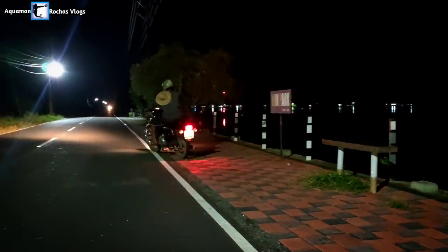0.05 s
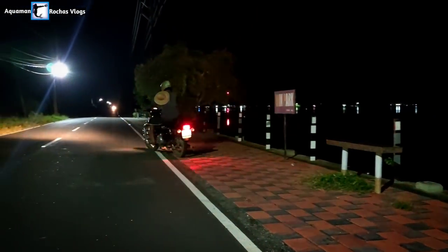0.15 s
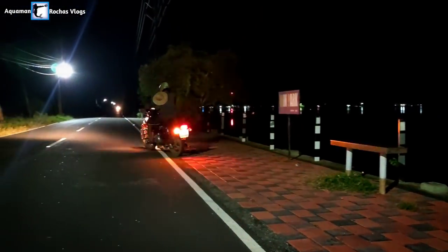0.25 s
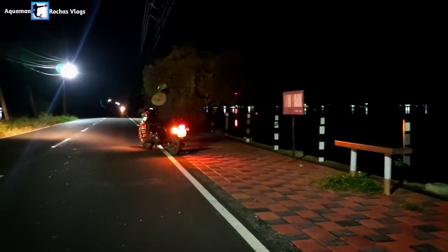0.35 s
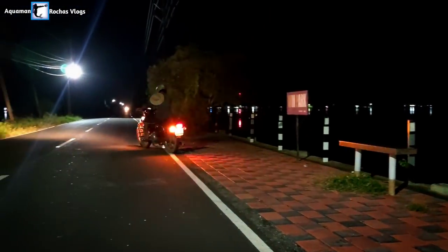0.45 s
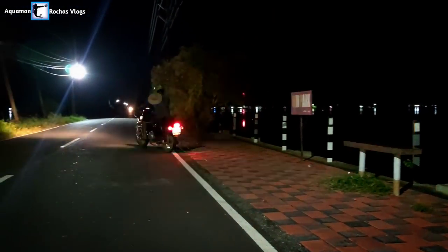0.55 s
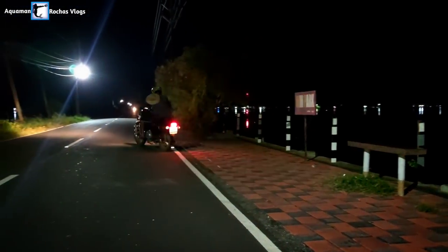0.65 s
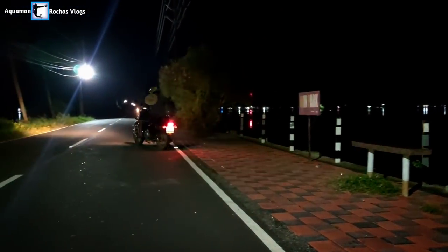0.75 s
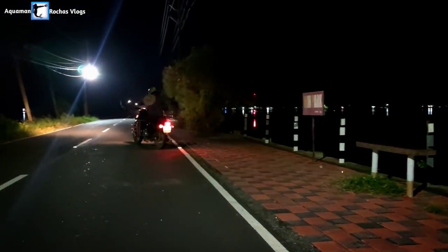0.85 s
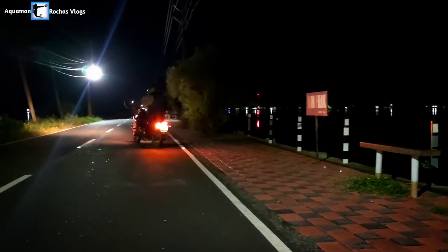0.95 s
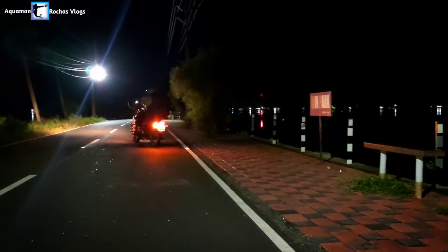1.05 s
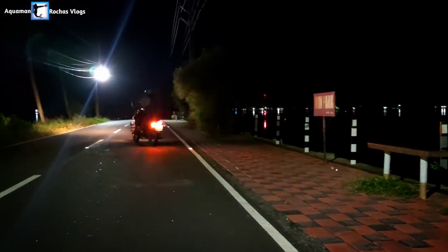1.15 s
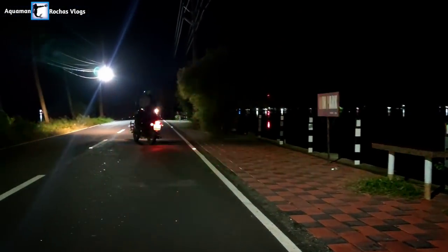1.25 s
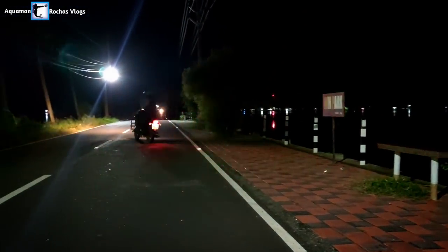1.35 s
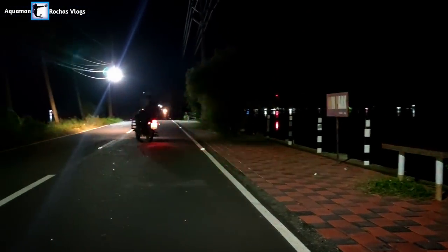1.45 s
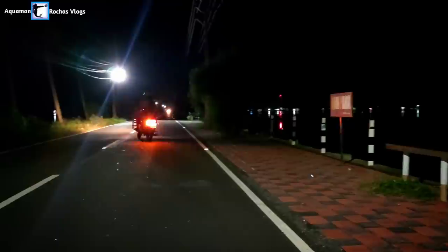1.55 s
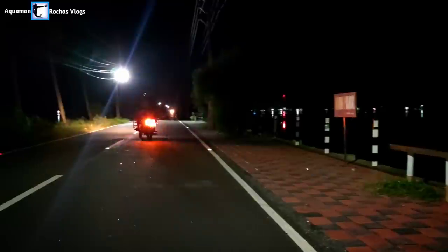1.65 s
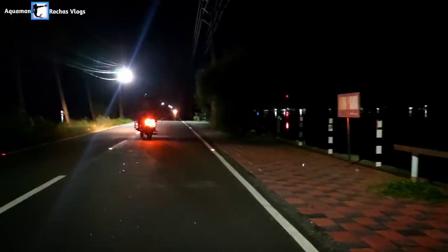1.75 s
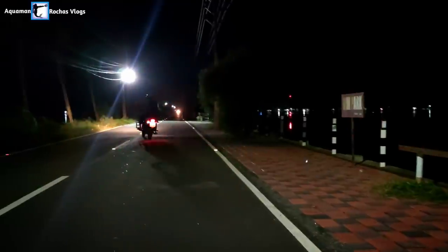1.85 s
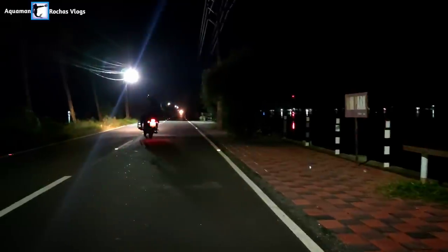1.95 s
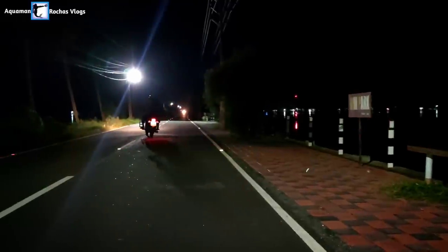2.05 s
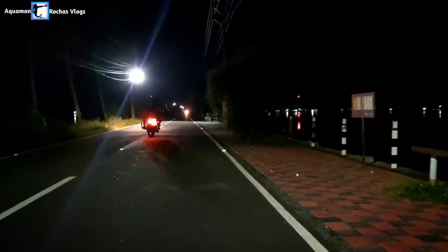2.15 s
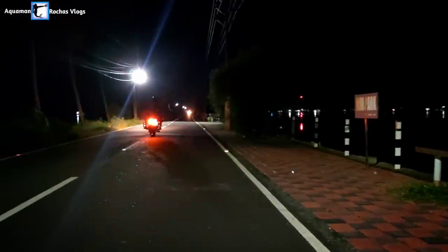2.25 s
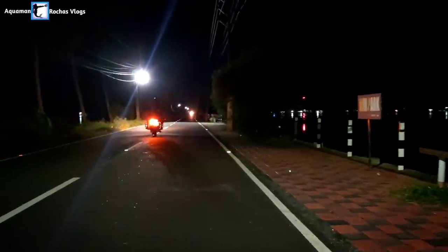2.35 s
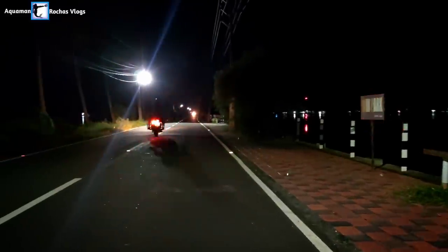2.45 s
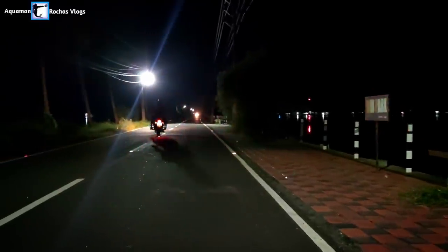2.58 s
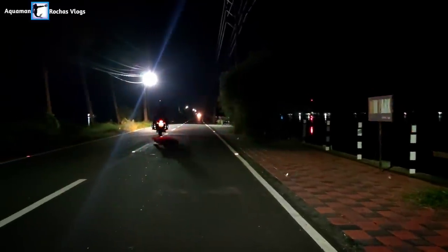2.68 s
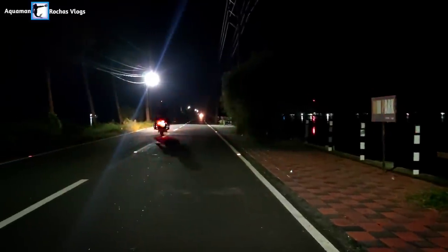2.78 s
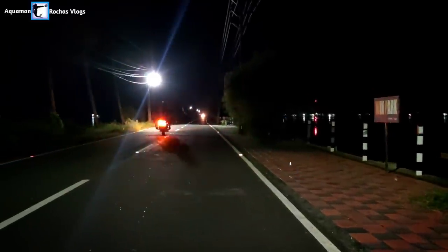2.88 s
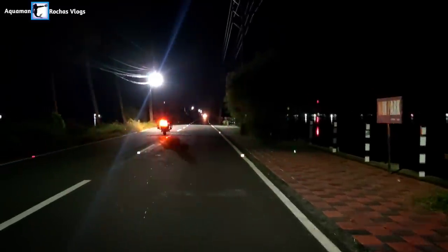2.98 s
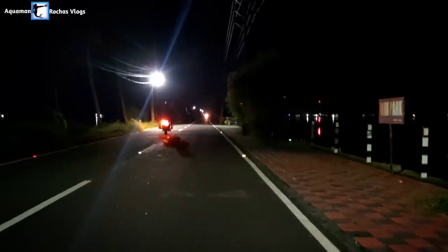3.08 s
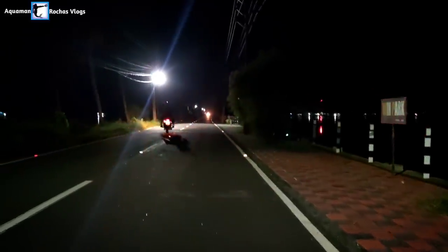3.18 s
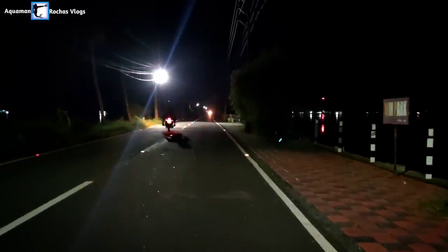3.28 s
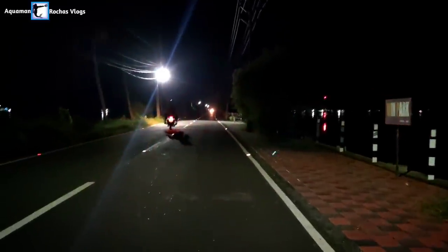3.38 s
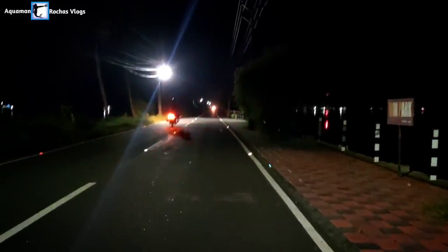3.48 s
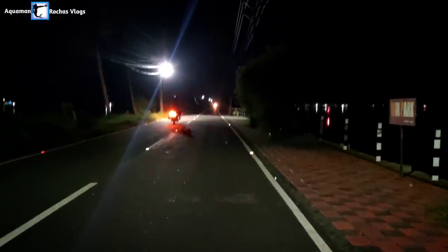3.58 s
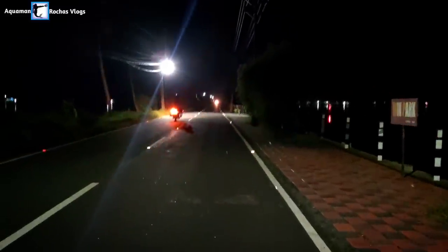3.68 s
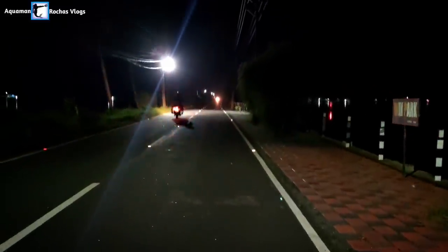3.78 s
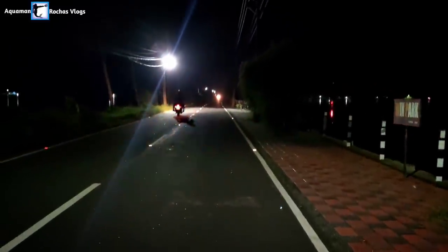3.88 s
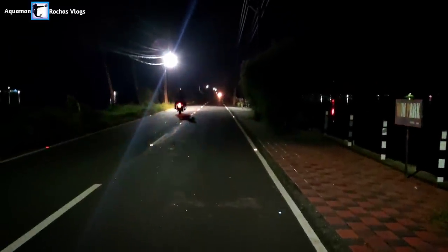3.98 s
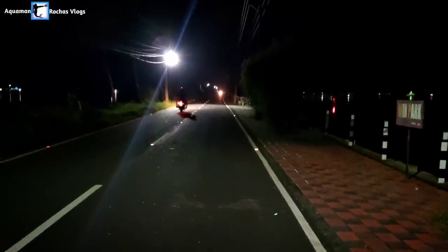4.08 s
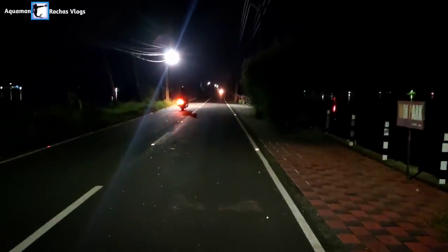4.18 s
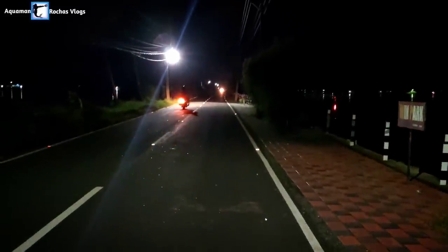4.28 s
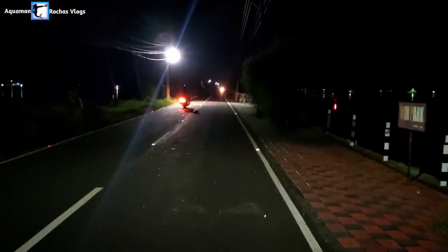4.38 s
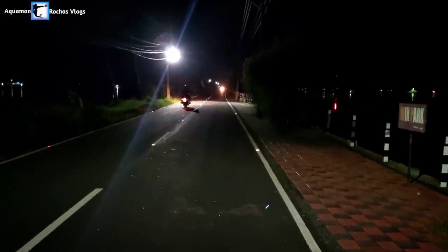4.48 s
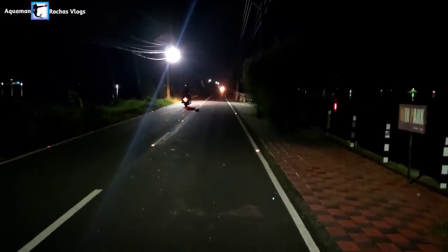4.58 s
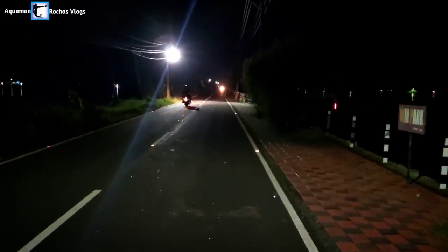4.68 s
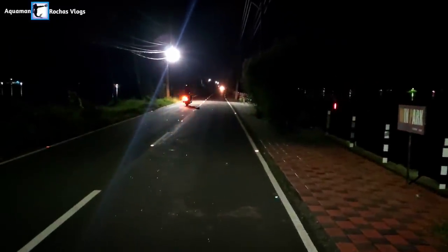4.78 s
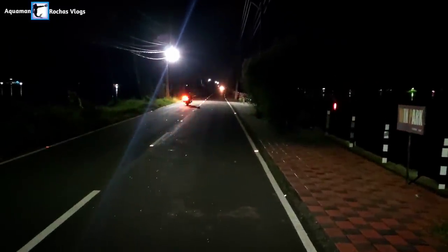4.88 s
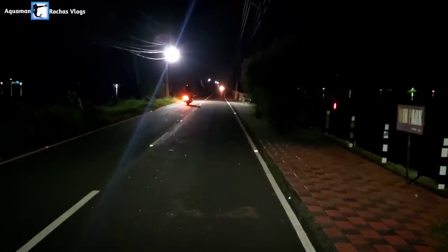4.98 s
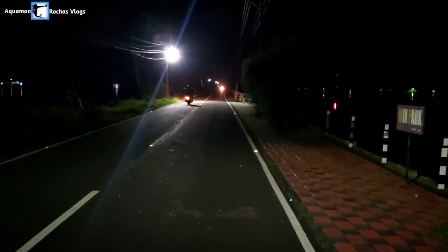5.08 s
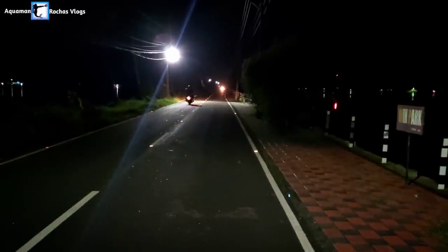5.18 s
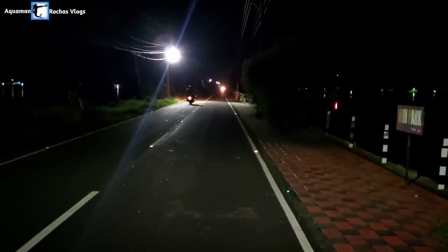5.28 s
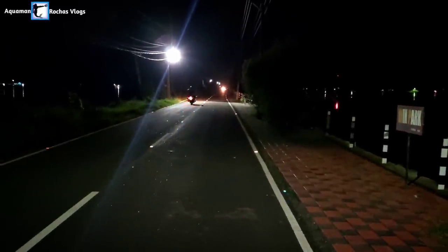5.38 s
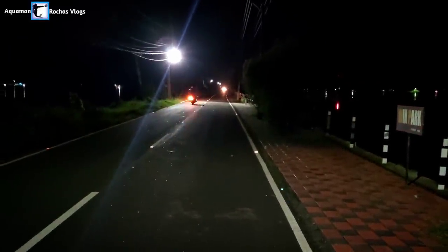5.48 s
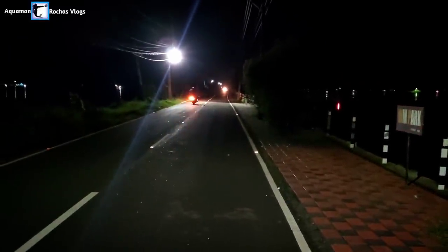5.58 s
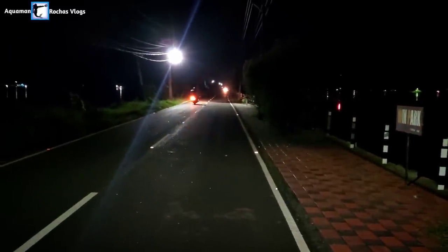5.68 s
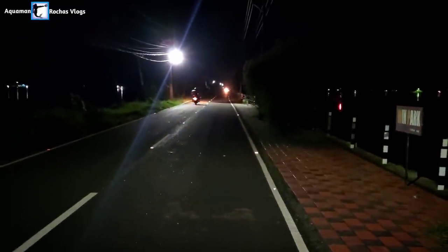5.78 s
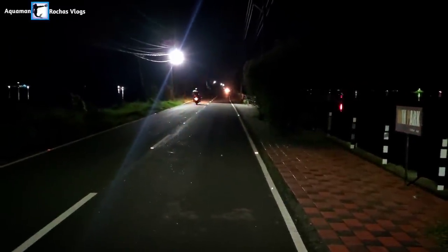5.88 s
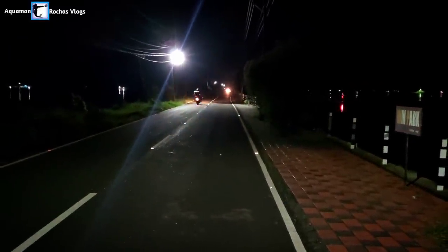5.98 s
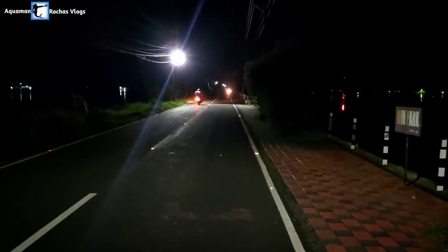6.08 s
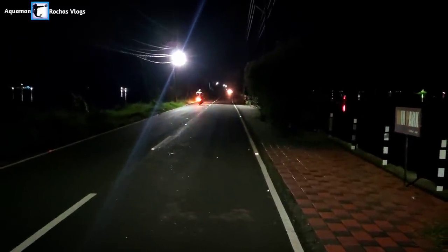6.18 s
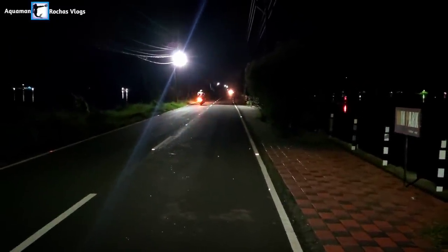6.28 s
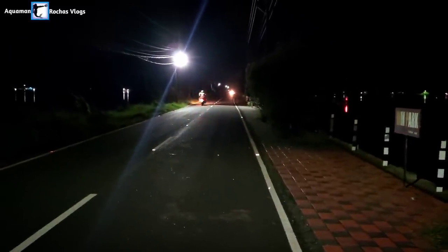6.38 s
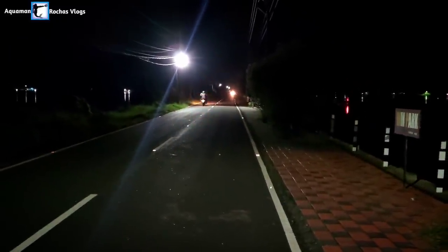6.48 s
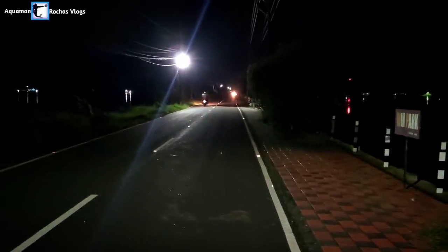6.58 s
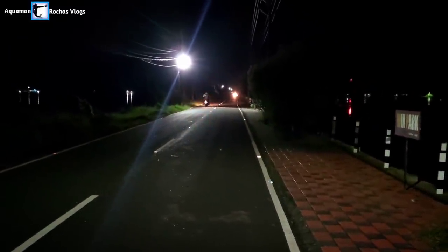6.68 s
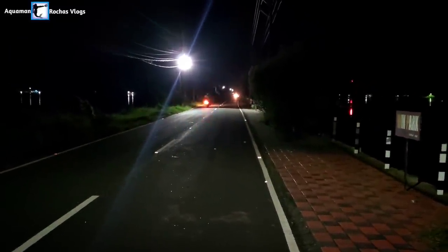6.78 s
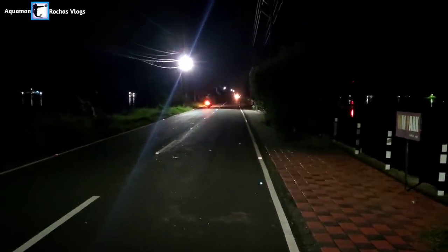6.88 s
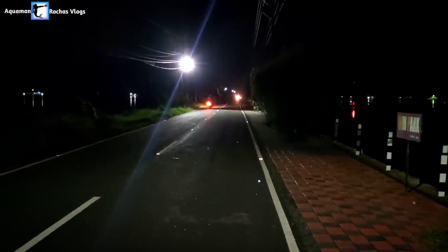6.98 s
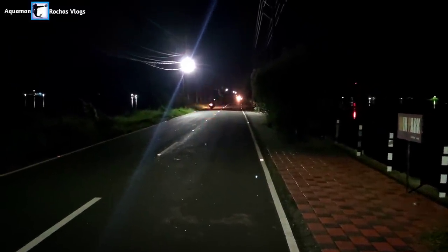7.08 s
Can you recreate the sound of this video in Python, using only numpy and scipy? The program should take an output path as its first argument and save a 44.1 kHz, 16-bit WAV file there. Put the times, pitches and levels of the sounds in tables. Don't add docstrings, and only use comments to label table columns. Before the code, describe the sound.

Outdoors at night beside a lakeside road, a single-cylinder motorcycle pulls away from very close. Heavy, crackling exhaust thumps speed up, drop soft and slow for a gear change, build again, soften for a second change, then continue quieter and duller far off. Crickets chirp in short high phrases, mostly left, with faint insect trills right. The stationary stereo microphone is overloaded by the first beats.

```python
import sys
import numpy as np
from scipy import signal
from scipy.fft import rfft, irfft, next_fast_len
from scipy.io import wavfile

SR = 44100
rng = np.random.default_rng(int(sys.argv[2]) if len(sys.argv) > 2 else 0)


def wav_out(sig):
    wavfile.write(sys.argv[1], SR, np.round(np.clip(np.atleast_2d(sig).T, -1, 1) * 32767).astype(np.int16))


def volts(x):
    e = np.asarray(x, float) / 20
    return 10 ** e


N = 314874

# pressure trough t/s, thump level/dB, crack level/dB, bright edge level/dB
FIRINGS = [(0.0211, -2.1, -20.5, -28.3), (0.105, -1.9, -24.3, -20.4), (0.1851, -1.7, -28.7, -19.6),
           (0.2635, -1.9, -22.8, -16.9), (0.3405, -0.8, -23.8, -19.9), (0.4156, -1.5, -28.6, -18.4),
           (0.4898, -1.6, -34.7, -17.8), (0.563, -1.4, -31.6, -19.4), (0.6345, -2.5, -30.6, -21.0),
           (0.7048, -2.2, -28.0, -21.4), (0.7738, -2.9, -29.2, -21.3), (0.8414, -2.7, -23.3, -15.8),
           (0.9078, -2.6, -22.8, -17.8), (0.9727, -1.3, -24.8, -17.3), (1.0358, -1.3, -30.3, -23.3),
           (1.0981, -1.4, -28.4, -21.4), (1.1595, -2.0, -24.8, -17.8), (1.2192, -1.0, -21.9, -20.7),
           (1.2772, -1.8, -22.7, -16.2), (1.3339, -2.1, -21.0, -20.6), (1.3894, -1.2, -23.9, -18.1),
           (1.444, -1.0, -21.1, -19.7), (1.4972, -1.6, -17.1, -21.4), (1.5494, -0.8, -23.6, -19.3),
           (1.601, -2.1, -21.9, -21.8), (1.6519, -3.5, -24.0, -23.5), (1.7061, -13.0, -50.0, -51.4),
           (1.7653, -6.7, -44.4, -44.3), (1.8203, -7.9, -42.2, -44.1), (1.8767, -8.8, -49.8, -42.8),
           (1.9347, -9.7, -43.1, -36.8), (1.9937, -11.3, -44.8, -53.8), (2.0558, -15.7, -50.9, -44.1),
           (2.1175, -12.5, -48.5, -46.3), (2.1803, -17.9, -60, -69.0), (2.2639, -20.9, -60, -53.0),
           (2.3159, -18.1, -60, -58.4), (2.3751, -10.3, -38.9, -43.2), (2.4461, -9.0, -37.8, -38.5),
           (2.5228, -9.0, -33.6, -42.6), (2.598, -6.9, -31.3, -33.1), (2.6715, -6.3, -27.5, -26.0),
           (2.745, -5.8, -24.5, -33.4), (2.8169, -6.0, -26.1, -23.9), (2.887, -5.2, -26.2, -28.7),
           (2.9573, -4.8, -23.1, -29.2), (3.0259, -5.7, -26.9, -30.3), (3.0937, -6.0, -24.0, -32.6),
           (3.1602, -6.0, -26.1, -28.2), (3.2259, -5.5, -23.4, -32.4), (3.291, -6.3, -28.0, -27.5),
           (3.355, -6.8, -30.4, -32.4), (3.4183, -6.5, -28.2, -29.8), (3.4811, -6.0, -29.0, -26.1),
           (3.5428, -6.5, -26.5, -31.1), (3.6039, -5.6, -30.9, -28.1), (3.6644, -6.4, -26.3, -28.3),
           (3.7241, -6.4, -25.1, -20.6), (3.7833, -7.0, -25.9, -26.6), (3.8417, -6.5, -26.6, -25.1),
           (3.8996, -6.4, -27.9, -23.6), (3.9573, -6.4, -27.1, -20.1), (4.0144, -6.8, -27.6, -25.7),
           (4.0707, -7.0, -29.0, -24.5), (4.1269, -7.3, -28.3, -32.3), (4.1822, -7.3, -27.6, -28.0),
           (4.2371, -7.4, -27.5, -25.7), (4.292, -7.3, -26.1, -35.1), (4.3463, -7.0, -26.3, -29.2),
           (4.4, -7.6, -29.5, -32.0), (4.4534, -7.7, -31.8, -29.0), (4.5064, -7.6, -28.9, -29.6),
           (4.5591, -7.9, -31.1, -35.5), (4.6115, -7.8, -28.7, -33.2), (4.6637, -7.5, -32.7, -32.1),
           (4.7152, -8.4, -27.4, -28.9), (4.7666, -8.2, -30.5, -38.9), (4.8175, -7.8, -31.7, -26.7),
           (4.8685, -7.5, -31.8, -24.8), (4.9193, -8.9, -32.9, -33.8), (4.9694, -8.7, -31.8, -31.8),
           (5.0194, -10.0, -34.4, -30.8), (5.073, -20.4, -51.6, -60.6), (5.1305, -14.6, -54.4, -63.4),
           (5.1845, -15.2, -51.2, -60.2), (5.2396, -17.3, -47.9, -56.9), (5.2947, -17.6, -50.5, -59.5),
           (5.3528, -18.1, -53.2, -56.9), (5.4127, -21.0, -60, -54.7), (5.4775, -27.7, -60, -53.0),
           (5.5378, -20.3, -55.7, -50.1), (5.6018, -24.2, -60, -53.0), (5.6854, -27.7, -60, -60.8),
           (5.7544, -31.5, -60, -53.0), (5.7987, -21.9, -54.7, -47.7), (5.8674, -14.9, -38.5, -40.7),
           (5.9341, -15.8, -39.2, -39.9), (5.9985, -15.7, -39.8, -39.0), (6.0606, -16.1, -46.5, -42.5),
           (6.1251, -16.6, -47.6, -48.8), (6.1932, -16.3, -41.0, -40.3), (6.26, -15.3, -41.1, -34.2),
           (6.3256, -16.8, -42.1, -38.7), (6.3914, -17.2, -39.6, -43.4), (6.4583, -16.3, -40.8, -41.7),
           (6.5241, -16.5, -39.6, -42.0), (6.5895, -16.0, -39.9, -44.6), (6.6549, -15.6, -39.5, -46.4),
           (6.72, -15.2, -36.1, -38.0), (6.7844, -15.0, -38.0, -37.8), (6.8501, -16.2, -42.7, -48.4),
           (6.9146, -15.5, -35.3, -43.2), (6.9789, -15.4, -32.9, -35.5), (7.0425, -14.2, -31.5, -31.7),
           (7.1061, -13.8, -30.8, -37.9)]
# from t/s, to t/s
COASTING = [
    (1.68, 2.34),
    (5.05, 5.78),
]
# t/s, heat (0-1)
HEAT = [(0, 0.12), (.7, 0.14), (1.6, 0.48), (2.4, 0.24), (3.3, 0.67), (4.2, .9), (5, 0.83), (5.8, 0.54),
        (7.14, 0.88)]
# f/Hz, signed height, t60/s
COOL_MODES = [(65.1, -0.69, .14), (129.7, 0.5, .13), (205, 1.06, 0.032), (230, 0.33, 0.055),
              (257.8, 0.295, 0.18), (321, 0.19, 0.087)]
# f/Hz, signed height, t60/s
HOT_MODES = [(75.3, -0.45, 0.085), (134.4, 0.37, 0.096), (219, 0.23, 0.019), (238, 1, 0.067),
             (262, 0.38, 0.21), (337, 0.18, 0.089)]
# f/Hz, signed height, t60/s
SHUT_MODES = [(63, -0.71, 0.17), (118, 0.92, 0.046), (215, 0.84, 0.033), (248, 0.72, 0.065)]
# t/s, rasp level/dB, clatter level/dB, chamber level/dB, treble loss/(dB per 400 Hz above
# 8.5 kHz)
RIDE = [(0, -34.5, -45.5, -22.5, 1), (.6, -34, -47.5, -21, 1), (1.1, -29.5, -43.5, -23.5, -0.3),
        (1.66, -29.5, -44, -17, -0.7), (1.72, -35, -44, -20, -1.4), (2.1, -40.5, -52, -24, 1.3),
        (2.35, -42, -50, -20, -0.9), (2.7, -38, -48, -20, 0), (3.3, -37, -46.5, -20, 0.1),
        (4.0, -36.5, -48.5, -16, 1.8), (4.6, -39.5, -46.5, -17, 1), (5.04, -43.5, -46.5, -12.5, 8),
        (5.12, -42, -54.5, -21, 4), (5.7, -56, -69, -15, 4), (5.9, -43.5, -59, -14, 1.5),
        (6.5, -53.5, -63, -14, 0.9), (7.14, -49, -56, -19, 1)]
# f/Hz, level/dB per Hz
CRACK_SPECTRUM = [(900, -10), (1300, -0.5), (1800, -3), (2400, 0), (3000, 4.5), (4200, -0.5), (5200, 7),
                  (6200, -1), (7600, -18.5), (9500, -8), (12000, -1.5), (16000, -24.5)]
# f/Hz, level/dB
SHELL_MODES = [(2420, -5.5), (3050, -2), (4280, 4.5), (6070, 2), (7850, -19)]
# f/Hz, level/dB per Hz
RASP_SPECTRUM = [(300, 0.5), (400, -0.5), (450, -12), (520, -1.5), (900, 1.5), (1300, -13), (1700, -8)]
# f/Hz, cool level/dB, hot level/dB, t60/s
CHAMBER_MODES = [(392.3, 3.5, -14, 0.074), (507.4, -7, -4.5, 0.096), (541.2, -12, -0.5, 0.17),
                 (674.6, -19, -3, 0.14), (791.5, -21, -7.5, 0.13), (851, -8, -11, 0.16),
                 (1161, -1.5, -33, 0.073), (1417, -5.5, -29, 0.033)]
# f/Hz, level/dB per Hz
CLATTER_SPECTRUM = [(900, -1.5), (1800, -3.5), (2500, -0.5), (4200, -1.5), (5800, 0.5), (7600, -9.5),
                    (10500, -15), (13000, -9), (16000, -14)]
# first chirp t/s, chirps, level/dB
PHRASES = [(0.62, 7, -25), (1.468, 7, -24), (2.329, 6, -21.5), (3.158, 6, -24), (3.991, 6, -18),
           (4.821, 7, -21), (5.689, 7, -17), (6.555, 6, -17.5)]
# t/s, level/dB
BUZZ = [(0.0, -43), (0.3, -50), (0.85, -44), (1.45, -68), (1.65, -49), (2.78, -53), (3.38, -48),
        (3.74, -52), (4.49, -49.5), (4.73, -62), (4.87, -53), (5.11, -50), (5.37, -55), (5.51, -54.5),
        (6.03, -62), (6.98, -52.5), (7.14, -65)]
# t/s, level/dB, length/s
RUSTLES = [
    (6.095, -43, .014),
    (4.148, -37, .002),
    (5.425, -50, .004),
]
# f/Hz, level/dB per Hz
NIGHT_SPECTRUM = [(40, 0), (75, 6), (170, -2), (240, -2), (330, -14), (700, -19), (1100, -26), (2300, -28),
                  (4500, -33), (6500, -30), (8300, -34), (10600, -44), (13000, -44), (16000, -46)]
# f/Hz, left minus right level/dB
PORT_BALANCE = [(60, 0), (1650, 0), (2100, 7), (2800, -16), (3500, -3), (4500, -7), (5400, 2), (6200, -6),
                (7000, 4), (8050, 21), (9000, 3), (10000, -15), (16000, -20)]
# f/Hz, left lead/rad
PORT_PHASE = [(0, 0), (900, -.3), (1400, -.6), (1650, -3.1), (2100, -5.2), (2700, -5.2), (3500, -4.8),
              (5200, -3.4), (6500, -2), (7800, -1), (8600, -3), (16000, -6)]

FIRING_S, THUMP_DB, CRACK_DB, EDGE_DB = np.transpose(FIRINGS)
TRILL_START_S, TRILL_EVERY_S, TRILL_LENGTH_S = 0.0, 0.3512, 0.17


def rms_one(x):
    return x / np.sqrt(np.mean(x ** 2) + 1e-20)


def curves_at(rows, seconds):
    s, *columns = np.transpose(rows)
    return [np.interp(seconds, s, column) for column in columns]


def in_time(rows):
    return curves_at(rows, np.arange(N) / SR)


def at_firings(rows):
    return curves_at(rows, FIRING_S)


def at_hz(points, hz):
    f, level_db = np.transpose(points)
    return np.interp(np.log(hz), np.log(f), level_db)


def band(x, low_hz, high_hz):
    return signal.sosfilt(signal.butter(2, [low_hz, high_hz], "band", fs=SR, output="sos"), x)


def ring(x, hz, t60):
    r, w = volts(-60 / (t60 * SR)), 2 * np.pi * hz / SR
    return signal.lfilter([0, np.sin(w)], [1, -2 * r * np.cos(w), r * r], x + 1e-18)


def clicks(seconds, heights):
    out = np.zeros(N)
    places = np.round(np.asarray(seconds) * SR).astype(int)
    out[np.clip(places, 0, N - 1)] = heights
    return out


def dying(x, rise_s, t60):
    r, q = volts(-60 / (t60 * SR)), np.exp(-1 / (rise_s * SR))
    decay = signal.lfilter([1], [1, -r], x + 1e-18)
    return signal.lfilter([1 - q], [1, -q], decay)


def coloured(spectrum, scatter_db, envelope, firing_db=lambda hz: 0):
    cycle = np.clip(np.searchsorted(FIRING_S * SR - 300, np.arange(N)) - 1, 0, None)
    lowest, highest = spectrum[0][0], spectrum[-1][0]
    edges = lowest * 2 ** np.arange(0, np.log2(highest / lowest) + 0.2, 1 / 3)
    white = rng.standard_normal((2, N)) * envelope
    chance = rng.standard_normal((len(FIRINGS), 40))
    out, power = 0, 0
    for k, (low, high) in enumerate(zip(edges, edges[1:])):
        hz = np.sqrt(low * high)
        gain = volts(at_hz(spectrum, hz))
        per_firing = volts(firing_db(hz) + scatter_db * chance[:, k])
        out = out + gain * per_firing[cycle] * band(white[k % 2], low, high)
        power += gain ** 2 * (high - low) * 2 / SR
    return out / np.sqrt(power)


def thump():
    shut = sum((FIRING_S > start) & (FIRING_S < end) for start, end in COASTING)
    heat = at_firings(HEAT)[0]
    driven = volts(THUMP_DB) * (1 - shut)
    cool = pipe(driven * (1 - heat), COOL_MODES, lead_s=0.0031, width_s=0.00076, direct=0.3)
    hot = pipe(driven * heat, HOT_MODES, lead_s=0.0034, width_s=0.00074, direct=0.08)
    coasting = pipe(volts(THUMP_DB) * shut, SHUT_MODES, lead_s=0.0042, width_s=0.0014, direct=0.82)
    return cool + hot + coasting


def pipe(heights, modes, lead_s, width_s, direct):
    slug = np.exp(-0.5 * (np.arange(-400, 401) / SR / width_s) ** 2)
    flow = signal.fftconvolve(clicks(FIRING_S - lead_s, heights), slug, "same")
    ringing = sum(h * ring(flow, hz, t60) for hz, h, t60 in modes)
    return direct * flow + ringing / slug.sum()


def crack():
    s = FIRING_S - 0.0031
    fronts = clicks(s, 0.98)
    burst, tail = dying(fronts, 0.0004, 0.015), dying(fronts, 0.0016, 0.11)
    envelope = volts(8.5) * burst + volts(-4) * tail
    chance = rng.standard_normal((len(s), 2 * len(SHELL_MODES)))
    pings = np.zeros(N)
    for k, (hz, db) in enumerate(SHELL_MODES):
        times = s + 0.00016 * chance[:, 2 * k]
        blows = volts(front_db(hz) + db + 5.24 * chance[:, 2 * k + 1])
        pings += ring(clicks(times, blows), hz, 0.017)
    return coloured(CRACK_SPECTRUM, 3.0, envelope, front_db) + volts(1.5) * pings


def front_db(hz):
    loss = max(hz - 8500, 0) / 400
    loss = loss + 5.5 * (hz < 2600) * (FIRING_S > 5.5)
    loss = loss + 60 * (hz < 3700) * (FIRING_S < 0.45)
    return (CRACK_DB if hz < 5500 else EDGE_DB) - at_firings(RIDE)[3] * loss


def rasp():
    gate = rms_one(0.16 + dying(clicks(FIRING_S - 0.0035, 1), 0.0014, 0.079))
    return volts(in_time(RIDE)[0] - 2) * coloured(RASP_SPECTRUM, 1.2, gate)


def chambers():
    heat, song_db = at_firings(HEAT)[0], at_firings(RIDE)[2]
    chance = rng.standard_normal((len(FIRINGS), 2 * len(CHAMBER_MODES)))
    out = np.zeros(N)
    for k, (hz, cool_db, hot_db, t60) in enumerate(CHAMBER_MODES):
        mode_db = cool_db + heat * (hot_db - cool_db) + 2.0 * chance[:, 2 * k]
        blows = volts(THUMP_DB + song_db + mode_db) * (-1) ** k
        times = FIRING_S - 0.003 + 0.00015 * chance[:, 2 * k + 1]
        out += ring(clicks(times, blows * (1 - heat)), hz * 0.96, t60)
        out += ring(clicks(times, blows * heat), hz * 1.01, t60)
    return out


def engine_clatter():
    return volts(in_time(RIDE)[1] + 4.5) * coloured(CLATTER_SPECTRUM, 2.1, 0.73)


def crickets():
    times = [s + 0.0437 * k + 0.0027 * (k > 0) for s, count, db in PHRASES for k in range(count)]
    levels = [db + 7 - 4.2 * (k == 0) for s, count, db in PHRASES for k in range(count)]
    out = signal.fftconvolve(clicks(times, volts(levels)), chirp(8478, 850, 0.026))[:N]
    for pitch, pace, phrase, start, far in rng.random((12, 5)):
        s = np.arange(start * 0.04, N / SR, 0.041 + 0.008 * pace)
        swell = np.sin(2 * np.pi * (s / (0.7 + 0.5 * phrase) + start))
        singing = np.clip(0.2 + 1.5 * swell, 0.05, 1)
        strokes = clicks(s, volts(-27 - 9.5 * far) * singing)
        out += signal.fftconvolve(strokes, chirp(7950 + 900 * pitch, 480, 0.024))[:N]
    hiss = rms_one(band(rng.standard_normal(N), 10000, 11100))
    return out + volts(-42) * hiss


def chirp(start_hz, fall_hz, length_s):
    u = np.arange(round(length_s * SR)) / (length_s * SR)
    slide = 2 * np.clip(u - 0.45, 0, 1) ** 1.4
    hz = start_hz - 0.12 * fall_hz * u - fall_hz * slide
    catch = 1 - 0.7 * np.exp(-((u - 0.62) / 0.05) ** 2)
    shape = np.sin(np.pi * u ** 0.6) * catch * volts(-10 * u)
    return shape * np.sin(2 * np.pi * np.cumsum(hz) / SR)


def trills():
    t = np.arange(N) / SR
    phase = np.clip((t - TRILL_START_S) % TRILL_EVERY_S / TRILL_LENGTH_S, 0, 1)
    burst = np.clip(2 * np.sin(np.pi * phase), 0, 1)
    low_pulses = 0.15 + np.cos(np.pi * 140 * t) ** 2
    high_pulses = 0.35 + np.cos(np.pi * 105 * t) ** 6
    low = band(rng.standard_normal(N) * burst * low_pulses, 6300, 7700)
    high = band(rng.standard_normal(N) * high_pulses, 12000, 16000)
    buzz = volts(in_time(BUZZ)[0] + 3) * rms_one(high)
    return volts(-54.5) * rms_one(low) + buzz


def rustles():
    t = np.arange(N) / SR
    swell = sum(volts(db) * np.exp(-0.5 * ((t - s) / length) ** 2) for s, db, length in RUSTLES)
    return swell * rms_one(band(rng.standard_normal(N), 1500, 3600))


def night_air():
    return volts(-40.5) * coloured(NIGHT_SPECTRUM, 2.3, 1)


def ports(shared, left_only, right_only):
    size = next_fast_len(N)
    hz = np.arange(size // 2 + 1) * SR / size + 1
    phase = np.interp(hz, *np.transpose(PORT_PHASE))
    response = volts(at_hz(PORT_BALANCE, hz)) * np.exp(1j * phase)
    left = irfft(rfft(shared + left_only, size) * response, size)[:N]
    return np.array([left, shared + right_only])


def scene():
    low, clatter = thump(), engine_clatter()
    engine = volts(3) * crack() + clatter + rasp() + chambers()
    air = night_air()
    scattered = volts(-2) * band(crack() + volts(-3) * np.roll(clatter, 5000), 600, 16000)
    left_air, right_air = (volts(-2) * band(np.roll(air, lag), 300, 16000) for lag in (9000, 20000))
    shared = engine + air + rustles() + volts(-16.5) * crickets()
    heard = ports(shared, scattered + left_air, right_air + trills())
    return heard + np.array([np.roll(low, -4), low])


def low_pass(x):
    return signal.sosfilt(signal.butter(12, 16460, fs=SR, output="sos"), x)


def record(dry):
    x = signal.sosfilt(signal.butter(2, 40, "high", fs=SR, output="sos"), dry)
    mix = np.clip(x, -1, 1)
    return low_pass(mix)


dry = scene()
out = record(dry)
wav_out(out)
```